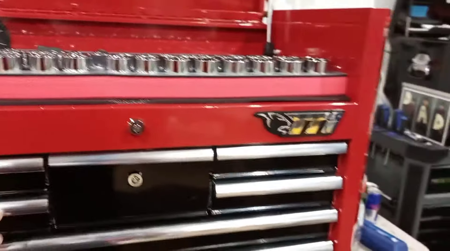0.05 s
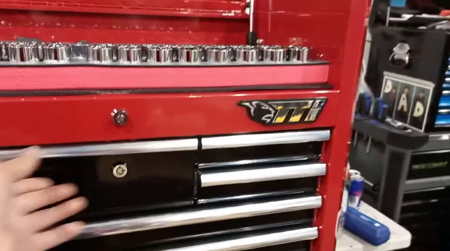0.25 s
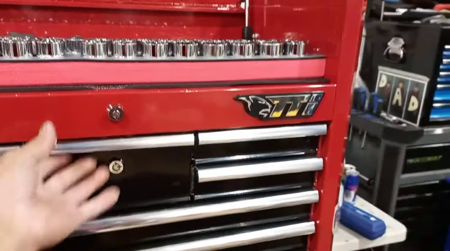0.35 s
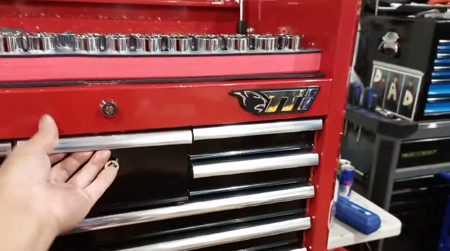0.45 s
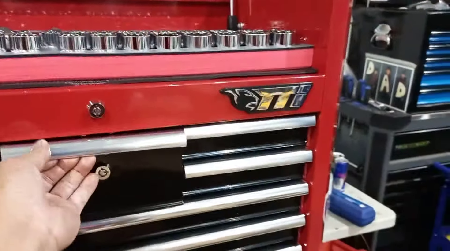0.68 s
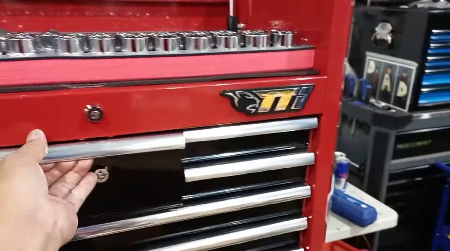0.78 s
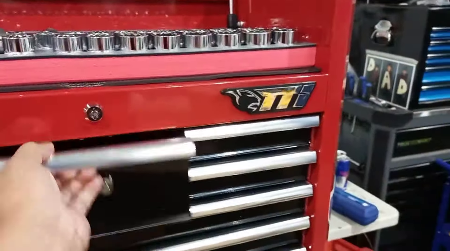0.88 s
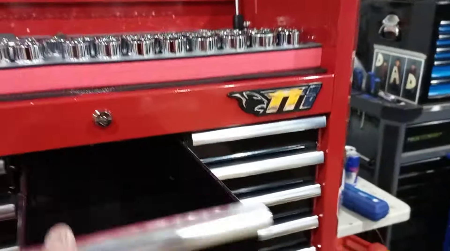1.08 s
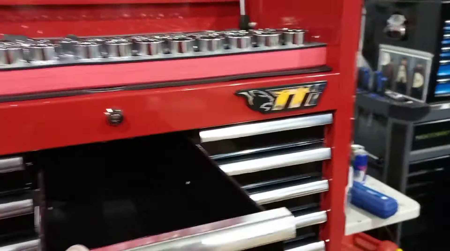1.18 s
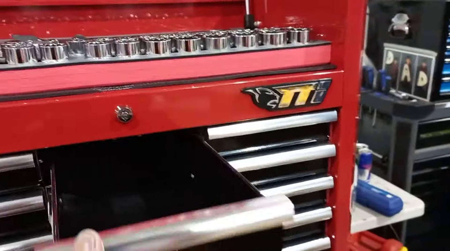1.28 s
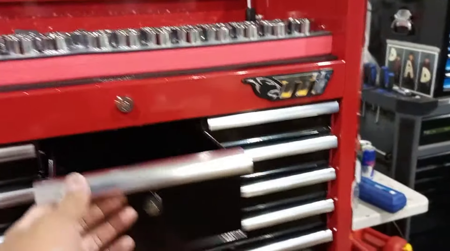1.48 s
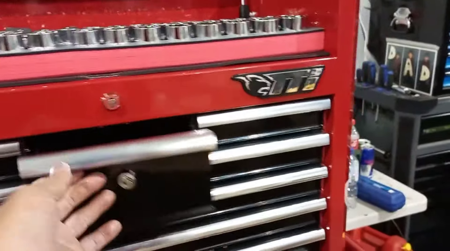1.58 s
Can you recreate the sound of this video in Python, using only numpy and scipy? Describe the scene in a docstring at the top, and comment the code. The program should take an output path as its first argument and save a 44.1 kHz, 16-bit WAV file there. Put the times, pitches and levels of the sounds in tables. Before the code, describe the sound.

A steel tool chest drawer opens close by in a small workshop. Its catch clicks, two clunks set loose tools ringing, then it rumbles softly along its slides and clacks against the end stop over faint hiss and hum.

```python
"""A small workshop, where a steel tool chest drawer is opened. Its catch clicks, and the drawer jerks
free with two clunks that shake the cabinet and set loose tools ringing. It rumbles out on its slides
and clacks against the end stop. Each blow rings the steel as a few clear modes over a wash of decaying
noise bands. A short room echo follows, and under it all lie the room's steady hiss and hum."""
import sys
import numpy as np
from scipy import signal
from scipy.fft import rfft, irfft, next_fast_len
from scipy.io import wavfile

SR = 44100
rng = np.random.default_rng(int(sys.argv[2]) if len(sys.argv) > 2 else 0)


def dump_mix(stems):
    """Bounce the given channels to the path in sys.argv[1] as a 16-bit WAV at rate SR."""
    frames = np.atleast_2d(stems).T  # one column per channel
    limited = np.clip(frames, -1, 1)  # hard clip at full scale
    pcm = np.round(limited * 32767).astype(np.int16)
    wavfile.write(sys.argv[1], SR, pcm)


N = 72765


def amp(db):
    """Decibels to gain."""
    return 10 ** (np.asarray(db) / 20)


def unit_rms(x):
    """Scales a signal to rms 1."""
    return x / np.sqrt(np.mean(x ** 2) + 1e-20)


def curve_at(points, hz):
    """Reads a curve of (f, value) points on a log frequency axis."""
    freqs, values = np.transpose(points)
    return np.interp(np.log(hz + 1), np.log(freqs + 1), values)


def equalise(x, gain_at):
    """Zero-phase EQ from a function of frequency."""
    size = next_fast_len(N + SR // 4)
    return irfft(rfft(x, size) * gain_at(np.fft.rfftfreq(size, 1 / SR)), size)[..., :N]


def noise(colour):
    """Coloured noise of rms 1."""
    return unit_rms(equalise(rng.standard_normal(N), lambda hz: amp(curve_at(colour, hz))))


def add(track, start, sound):
    """Mixes a sound into the track at a start time in seconds."""
    i = round(start * SR)
    track[i:i + len(sound)] += sound[:N - i]


def envelope(t, attack, t60):
    """A quick swell, then an even fall in dB."""
    return (1 - np.exp(-t / attack)) * np.exp(-np.log(1000) * t / t60)


def wash_bands(colour, decay, count=18):
    """Countless overlapping modes as steady noise bands: rows of f/Hz, t60/s, wave."""
    size = 3 * SR // 4
    hz = np.fft.rfftfreq(size, 1 / SR)
    wash = irfft(rfft(rng.standard_normal(size)) * amp(curve_at(colour, hz)), size)
    spectrum = rfft(unit_rms(wash))
    centres = np.geomspace(70, 14000, count)
    return [(centre, curve_at(decay, centre), irfft(spectrum * np.interp(hz, centres, solo), size))
            for centre, solo in zip(centres, np.eye(count))]


def struck_steel(hits, colour, decay, modes, wash_db):
    """Every blow rings the steel anew with its own brightness; low notes swell more slowly."""
    swell_cycles, tilt_pivot_hz, tilt_top_hz = 0.52, 1000, 4960
    out = np.zeros(N)
    for start, hit_db, tilt, attack in hits:
        layers = [(hz, t60, amp(wash_db) * wave) for hz, t60, wave in wash_bands(colour, decay)]
        t = np.arange(len(layers[0][2])) / SR
        for hz, mode_db, t60 in modes:
            layers.append((hz, t60, amp(mode_db + rng.normal(0, 1)) * np.sin(2 * np.pi * hz * t)))
        for hz, t60, wave in layers:
            octaves = np.log2(min(hz, tilt_top_hz) / tilt_pivot_hz)
            ring = wave * envelope(t, attack + swell_cycles / hz, t60)
            add(out, start, amp(hit_db + tilt * octaves) * ring)
    return out


# The jolt and its two aftershocks: t/s, level/dB, tilt/(dB per octave), attack/s
CABINET_HITS = [(.2665, -15.5, 0, .003), (.2845, -29.5, 3, 0.0027), (.3095, -36, 0.5, 0.0018)]
# Boomy tone of the cabinet's wash: f/Hz, level/dB
CABINET_COLOUR = [(30, -60), (70, -40), (115, -3), (290, -1), (480, -9), (700, -10), (1000, -5),
                  (1500, -11.5), (2800, -12), (4300, -12.5), (6000, -16), (7500, -26.5), (9500, -33.5),
                  (15000, -59)]
# Its tail, longest in the bass: f/Hz, t60/s
CABINET_DECAY = [(120, 0.35), (500, .16), (2000, .14), (5000, .12), (12000, .14)]
# Panel notes that stand out: f/Hz, level/dB re the hit, t60/s
CABINET_MODES = [(83, -27, 0.28), (113.8, -9.5, 0.36), (137.3, -7, 0.41), (164, -8.5, 0.3),
                 (233, -10, 0.23), (288.8, -0.5, 0.18), (360, -16.5, 0.37), (539.4, -18, 0.37),
                 (957, -9.5, 0.12), (1816, -8, 0.11), (2815, -18.5, 0.068), (3717, -24, .13),
                 (4240, -13, 0.1)]


def cabinet_clunk():
    """The drawer breaks free and the cabinet's panels boom."""
    return struck_steel(CABINET_HITS, CABINET_COLOUR, CABINET_DECAY, CABINET_MODES, wash_db=-0.35)


# A touch, the main clack and two rebounds: t/s, level/dB, tilt/(dB per octave), attack/s
STOP_HITS = [(1.2402, -41.5, 6.5, 0.004), (1.2528, -15, 1, 0.0032), (1.2667, -31.5, 1.5, 0.0023),
             (1.285, -33, 1.1, 0.0016)]
# Hard, mid-forward tone of the drawer's wash: f/Hz, level/dB
DRAWER_COLOUR = [(35, -55), (90, -26), (170, -0.5), (350, 4.5), (600, -4), (1000, 3.5), (1200, -8.5),
                 (1900, 2), (2800, -1.5), (4100, -1.5), (5500, -4.5), (7300, -10.5), (9500, -15.5),
                 (15000, -29)]
# Its tail, tight on top: f/Hz, t60/s
DRAWER_DECAY = [(200, 0.18), (800, 0.17), (2500, 0.067), (6000, 0.055), (12000, 0.028)]
# The drawer's boxy notes: f/Hz, level/dB re the hit, t60/s
DRAWER_MODES = [(174, -8, .13), (212, -11, .11), (372, -5, .19), (662, -21, .3), (1012, -8.5, .125),
                (1410, -15, .1), (2358, -19, .13), (3566, -16, .07), (4072, -15, .07)]


def end_stop_clack():
    """The extended drawer hits its stop and rebounds."""
    return struck_steel(STOP_HITS, DRAWER_COLOUR, DRAWER_DECAY, DRAWER_MODES, wash_db=0.0)


# A soft slide, then the snap: t/s, level/dB, tilt/(dB per octave), attack/s
CATCH_HITS = [(.197, -34, 0, 0.012), (.2178, -19.5, 1, 0.003)]
# Tone of the catch's wash, a thump under a crisp top: f/Hz, level/dB
CATCH_COLOUR = [(30, -53), (90, 7.5), (180, 0), (330, -7.5), (500, -2.5), (800, -14), (1300, -18.5),
                (1900, -3), (2800, -11.5), (3600, -1.5), (5800, 2.5), (7500, -6), (9500, -13), (15000, -39)]
# Its tail, just a tick in the treble: f/Hz, t60/s
CATCH_DECAY = [(200, 0.2), (1500, 0.12), (5000, 0.018), (12000, 0.026)]
# The catch's short pings: f/Hz, level/dB re the hit, t60/s
CATCH_MODES = [(510, -4, .075), (988, -15, .08), (1822, -13, .08), (2050, -9, .065), (3260, -9, .045),
               (3456, -4, .045), (4115, -13, .05), (5450, -3, .022)]


def catch_click():
    """The catch slides and snaps open."""
    return struck_steel(CATCH_HITS, CATCH_COLOUR, CATCH_DECAY, CATCH_MODES, wash_db=2.0)


# A quick double knock: t/s, level/dB, tilt/(dB per octave), attack/s
DETENT_HITS = [(.342, -27.5, 3.5, 0.003), (.3515, -22.5, 0, 0.001)]
# Rounder tone of the detent's wash: f/Hz, level/dB
DETENT_COLOUR = [(70, -7), (300, 4.5), (500, -6.5), (700, -0.5), (1050, -1), (1500, -5.5), (2700, -8.5),
                 (4000, -14.5), (5800, -15.5), (7500, -29), (15000, -49)]
# Its tail: f/Hz, t60/s
DETENT_DECAY = [(150, 0.2), (800, .16), (2500, 0.12), (6000, 0.048), (12000, 0.07)]
# Panel notes that the detent rings: f/Hz, level/dB re the hit, t60/s
DETENT_MODES = [(612, -18.5, 0.17), (695.6, -8.5, 0.09), (879, -8.5, 0.34), (1052, -9, .13),
                (1194, -19, 0.3), (1474, -32, 0.2), (3410, -16.5, 0.15)]


def detent_clunk():
    """The runners clear a detent with a lighter, midrange clunk."""
    return struck_steel(DETENT_HITS, DETENT_COLOUR, DETENT_DECAY, DETENT_MODES, wash_db=2.0)


# Three sharp cracks and one soft scuff: t/s, level/dB, attack/s, t60/s
EDGE_BURSTS = [(.2188, -50, .0005, 0.01), (0.3515, -37, 0.0011, 0.0091), (1.095, -47, 0.0116, 0.16),
               (1.2556, -13, 0.00037, .008)]
# Their upper-mid bite: f/Hz, level/dB
EDGE_COLOUR = [(200, -31.5), (1500, 9.5), (3500, -6), (6500, -1.5), (9000, -23), (15000, -30)]


def steel_edges():
    """Short unpitched bursts where bare steel meets steel."""
    out, t = np.zeros(N), np.arange(N) / SR
    for start, db, attack, t60 in EDGE_BURSTS:
        add(out, start, amp(db) * noise(EDGE_COLOUR) * envelope(t, attack, t60))
    return out


# Bumps along the rails: t/s, f/Hz, level/dB, half length/s
SLIDE_BUMPS = [(.74, 880, -54, .02), (.82, 880, -58, .02), (1.014, 931, -46, .015), (1.13, 928, -42, .015),
               (1.162, 909, -51, .02), (1.19, 880, -50, .012), (1.217, 890, -47, .009),
               (1.249, 847, -30, .005), (1.343, 1001, -41, .008)]
# Fader ride of the rumble: t/s, level/dB
ROLL_LEVEL = [(.33, -94), (.42, -37), (.52, -56.5), (.6, -60), (.73, -53.5), (.86, -64.5), (1.01, -54),
              (1.11, -57.5), (1.2, -51), (1.38, -50), (1.5, -66)]
# Its bass-heavy tone: f/Hz, level/dB
ROLL_COLOUR = [(50, -19), (85, 12), (170, -2.5), (300, 0), (600, -9), (2500, -10.5), (6500, -26),
               (9000, -59), (15000, -53)]


def rolling_slides():
    """The bearings rumble, and each bump draws a short rough chirp from the rails."""
    waver_hz, roughness = 130, 0.35
    t = np.arange(N) / SR
    waver = unit_rms(equalise(rng.standard_normal((2, N)), lambda hz: np.exp(-(hz / waver_hz) ** 2)))
    grit = 1 + roughness * (waver[0] + 1j * waver[1])  # shakes both level and phase
    chirps = np.zeros(N)
    for centre, hz, db, half_length in SLIDE_BUMPS:
        swell = np.exp(-((t - centre) / half_length) ** 2)
        rough_tone = np.real(grit * np.exp(2j * np.pi * hz * (t - centre)))
        chirps += amp(db) * swell * rough_tone
    rumble_gain = amp(np.interp(t, *np.transpose(ROLL_LEVEL), left=-120))
    return chirps + rumble_gain * noise(ROLL_COLOUR)


# High shimmer after the clunks: t/s, f/Hz, level/dB, attack/s, t60/s
TOOL_RINGS = [(.27, 6719, -38, .01, .22), (.285, 8327, -40, .025, .28), (.28, 9027, -50, .015, .18),
              (.28, 9393, -44, .02, .23), (.353, 4826, -45, .008, .3), (.353, 5054, -48, .008, .3),
              (.37, 2521, -36, .045, .62), (.37, 2590, -40, .05, .28)]


def loose_tools():
    """Jolted steel tools ring in thin, pure tones."""
    out, t = np.zeros(N), np.arange(SR) / SR
    for start, hz, db, attack, t60 in TOOL_RINGS:
        add(out, start, amp(db) * np.sin(2 * np.pi * hz * t) * envelope(t, attack, t60))
    return out


# The room's tail, longest in the mids: f/Hz, t60/s
ROOM_DECAY = [(150, 0.19), (1000, 0.32), (4000, 0.23), (10000, 0.19)]


def room_echo(sound):
    """The workshop answers with a short diffuse echo."""
    bands = wash_bands(colour=[(1, 0)], decay=ROOM_DECAY)  # flat colour
    t = np.arange(len(bands[0][2])) / SR
    tail = sum(wave * envelope(t, attack=0.016, t60=t60) for _, t60, wave in bands)
    return signal.fftconvolve(sound, tail / np.linalg.norm(tail))[:N]


# Dark bed of room air: f/Hz, level/dB
AIR_COLOUR = [(25, 7), (55, -8.5), (85, -2.5), (115, -5), (170, -1.5), (250, -7.5), (400, -11.5),
              (800, -12.5), (1300, -16.5), (1900, -9.5), (2450, -8), (3200, -15), (4500, -17.5),
              (6000, -26), (7500, -37), (9000, -45), (11000, -48), (15500, -56)]


def room_tone():
    """Steady noise, a low hum under a soft hiss."""
    return noise(AIR_COLOUR)


def scene():
    """The chest up close, with its echo and the room tone behind it, in mono."""
    echo_db, air_db = -17.5, -50
    chest = catch_click() + cabinet_clunk() + detent_clunk() + end_stop_clack()
    chest += rolling_slides() + steel_edges()
    mix = chest + amp(echo_db) * room_echo(chest) + loose_tools() + amp(air_db) * room_tone()
    return mix[None]


def record(dry):
    """A small microphone: no deep bass, a step down in the treble, nothing above its band limit."""
    low_cut_hz, top_hz = 57.4, 16000
    shelf_hz, shelf_width_hz, shelf_db = 7820, 160, -8.5
    thinned = signal.sosfilt(signal.butter(4, low_cut_hz, 'high', fs=SR, output='sos'), dry)
    shelf = lambda hz: amp(shelf_db * (1 + np.tanh((hz - shelf_hz) / shelf_width_hz)) / 2)
    return equalise(thinned, lambda hz: shelf(hz) * (hz < top_hz))


dry = scene()
out = record(dry)
dump_mix(out)
```